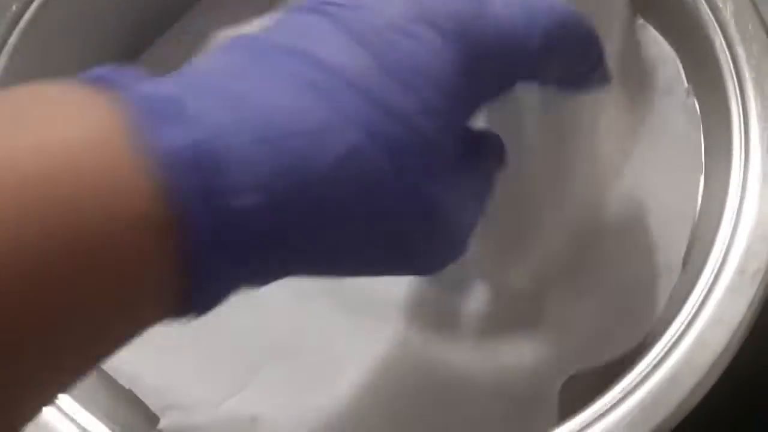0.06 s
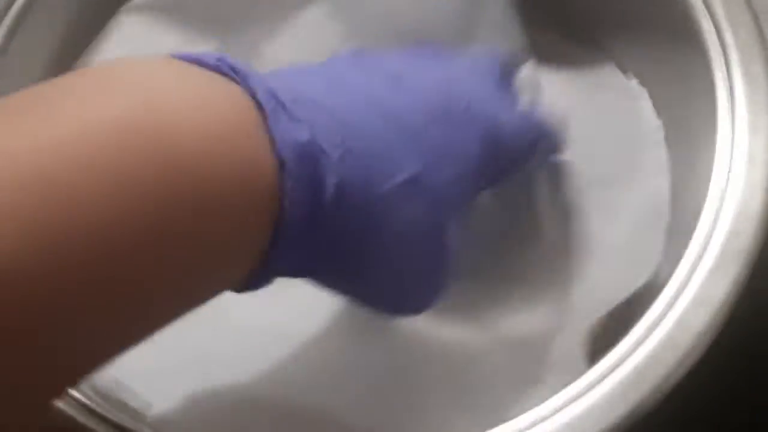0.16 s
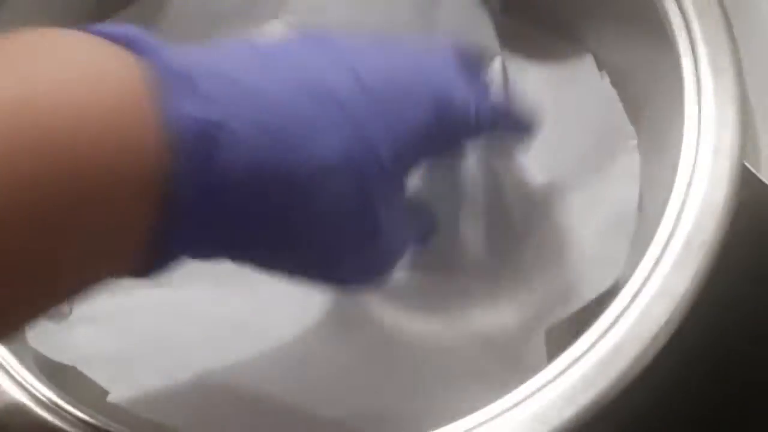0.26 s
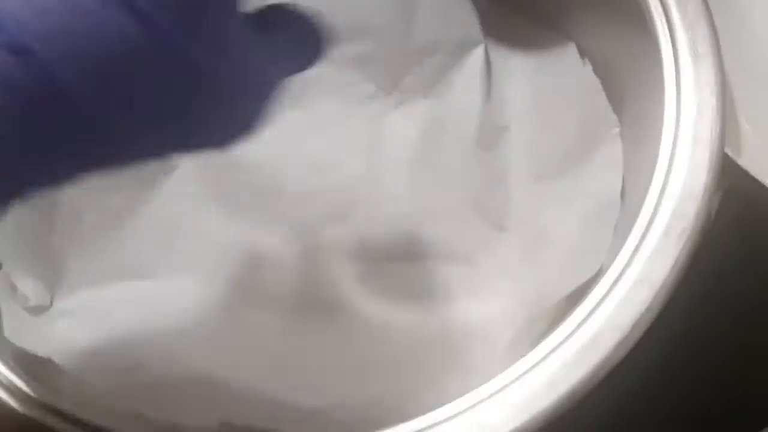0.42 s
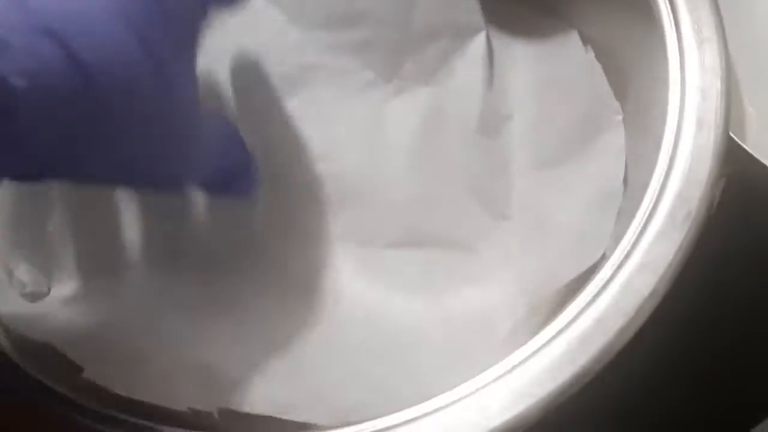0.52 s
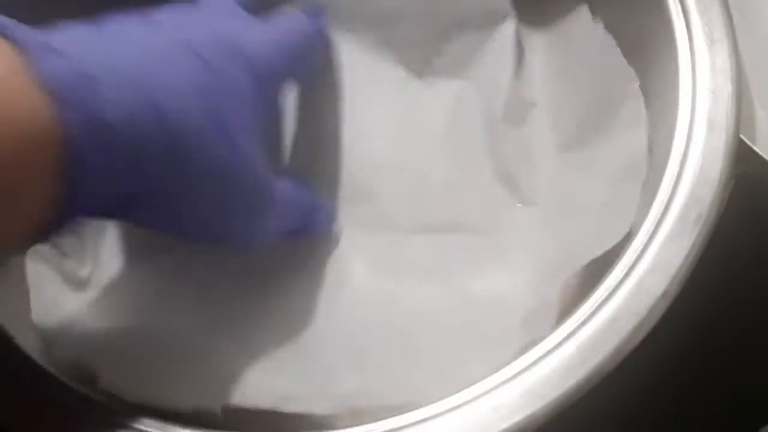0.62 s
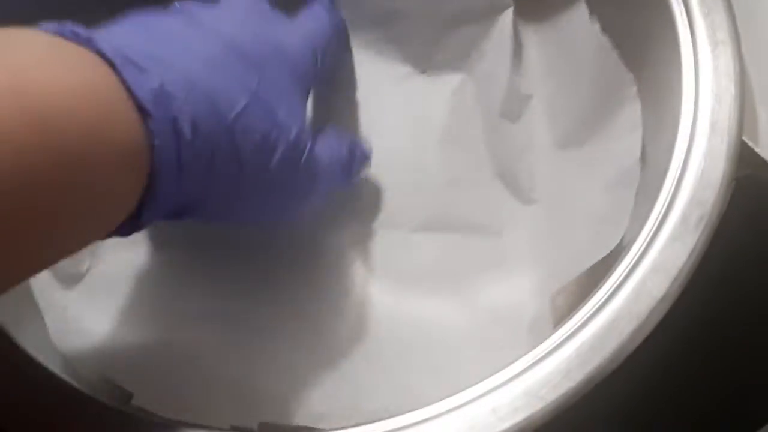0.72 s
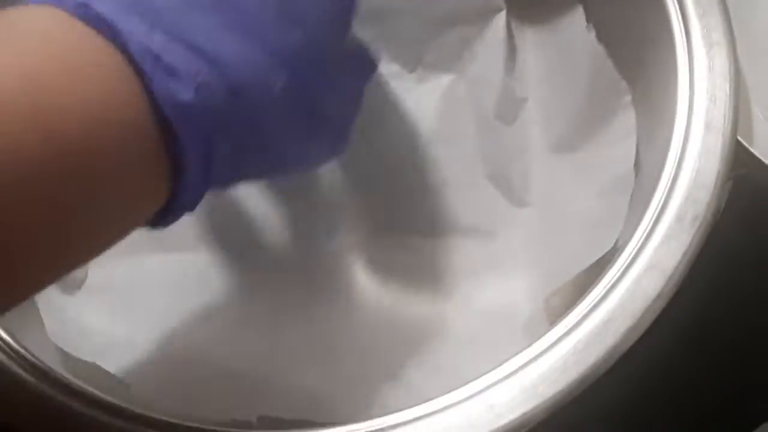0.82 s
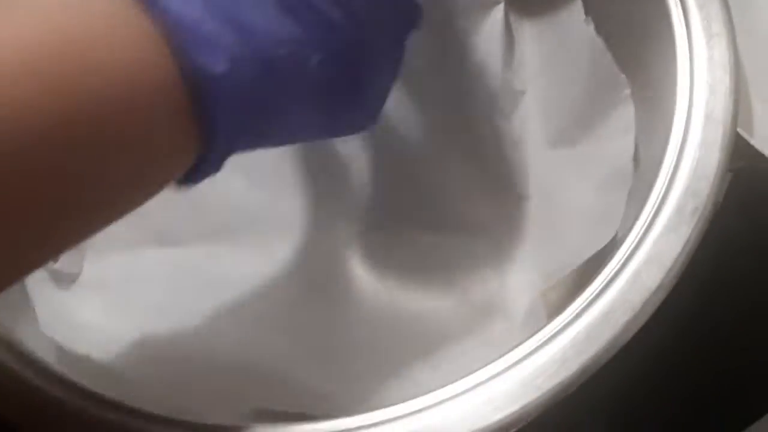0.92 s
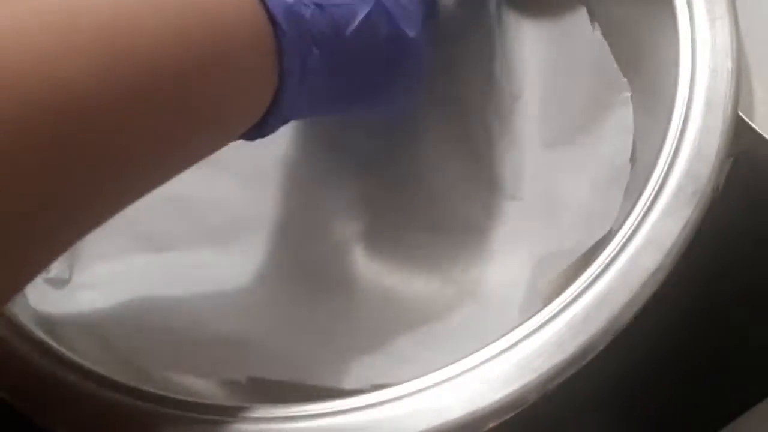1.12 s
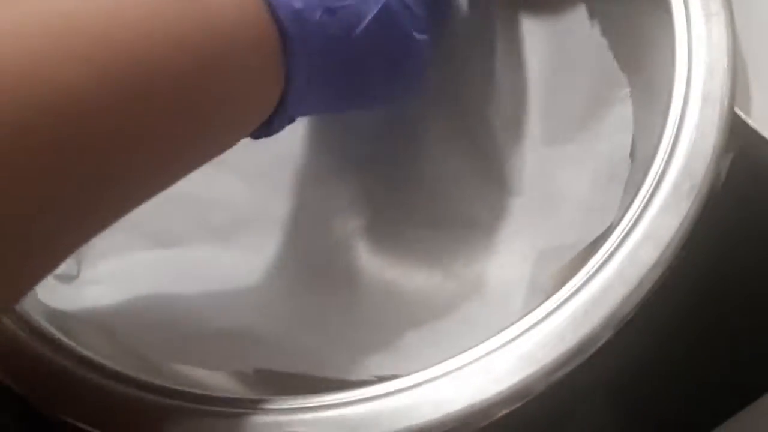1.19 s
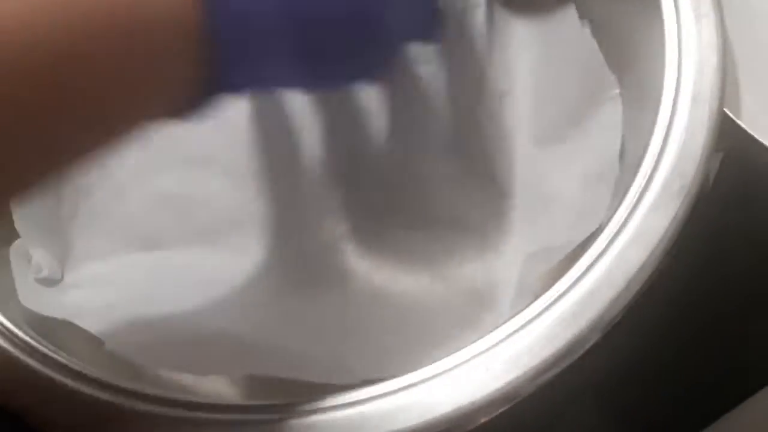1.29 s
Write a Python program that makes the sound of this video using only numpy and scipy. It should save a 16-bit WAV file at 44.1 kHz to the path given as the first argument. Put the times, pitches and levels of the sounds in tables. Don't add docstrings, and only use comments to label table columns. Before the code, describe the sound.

Stiff baking paper crinkles loudly in three quick bursts, with sharp bright snaps and soft low thuds, as a hand presses it into a steel pot; close stereo microphones, quiet kitchen with faint reverberation.

```python
import sys
import numpy as np
from scipy import signal
from scipy.fft import rfft, irfft
from scipy.io import wavfile
from scipy.ndimage import uniform_filter1d

SR = 44100
rng = np.random.default_rng(int(sys.argv[2]) if len(sys.argv) > 2 else 0)


def dump(signal):
    limited = np.clip(np.atleast_2d(signal).T, -1, 1)
    pcm = np.round(limited * 32767).astype(np.int16)
    wavfile.write(sys.argv[1], SR, pcm)


def invert_db(level):
    return 10 ** (np.asarray(level, dtype=float) / 20)


N = 59535

# (frequency [Hz], level [dB], decay time T60 [s])
HOLLOW_MODES = [(386, -14.5, 0.082), (429.6, -3.5, 0.14), (467.3, 5, 0.059), (509, 0, 0.08),
                (665, -10, 0.18), (988, -17, 0.1)]
BRIGHT_HZ = 6500


def evened(x):
    return x / np.sqrt(np.mean(x ** 2) + 1e-20)


def read(points, hz):
    f, value = np.transpose(points)
    return np.interp(np.log(hz + 1), np.log(f + 1), value)


def add(mix, s, sound):
    part = mix[max(round(s * SR), 0):][:len(sound)]
    part += sound[:len(part)]


def colour(x, points):
    hz = abs(np.fft.fftfreq(4096, 1 / SR))
    log_gain = np.log(invert_db(read(points, hz)))
    response = np.exp(np.conj(signal.hilbert(log_gain)))
    taps = np.fft.ifft(response).real[:2048]
    taps = taps / np.linalg.norm(taps)
    return signal.fftconvolve(x, taps[None], axes=1)[:, :N]


def ring(modes, length=0.95):
    t = np.arange(0, length, 1 / SR)
    out = 0
    for hz, db, t60 in modes:
        onset = 1 - np.exp(-t * hz)
        out = out + invert_db(db - 60 * t / t60) * np.sin(2 * np.pi * hz * t) * onset
    return out


def paired(left, other):
    # (frequency [Hz], share [0-1])
    direct_same = [(500, 0.99), (1300, 0.6), (2500, 0.3), (6000, 0.29), (16000, 0.9)]
    same = np.clip(read(direct_same, np.linspace(0, SR / 2, len(left))), 0, 1)
    return np.array([left, same * left + np.sqrt(1 - same ** 2) * other])


def air():
    # (frequency [Hz], density [dB/Hz])
    air_spectrum = [(15, -36.5), (25, -18), (114, 1), (200, -20), (317, -3.5), (1160, -15), (1520, -14.5),
                    (4400, -19.5), (16000, -24.5)]
    level_db, same = -65, 0.36
    a, b = rng.standard_normal((2, N))
    other = same * a + np.sqrt(1 - same ** 2) * b
    return invert_db(level_db) * colour(np.array([a, other]), air_spectrum)


def crackle():
    # (time [s], effort [dB], brightness [dB])
    presses = [
        [(0.046, -78.5, -21.5), (0.058, -37.5, -16.5), (.108, -32.5, -2.5), (.111, -24.5, -7),
         (.128, -21.5, -2), (.136, -28.5, -10)],
        [(.137, -27, -5), (.156, -22.5, -6.5), (.174, -18, 0), (.19, -23.5, -1), (.2, -27, -1.5),
         (0.224, -34, -7.5), (0.234, -28, -11), (0.26, -43.5, -9), (0.31, -76, -9)],
        [(0.542, -51.5, -23), (.548, -26.5, -11.5), (0.56, -36.5, -0.5), (0.597, -33.5, -2), (0.605, -24, 0),
         (.645, -23, -3), (.65, -34, 4), (.691, -31.5, 3), (.717, -46, -3)],
        [(.718, -40, 8.5), (.73, -34, -1), (.745, -38, -4), (.762, -42.5, -3), (.795, -44.5, -1),
         (0.826, -49.5, -12)],
        [(0.84, -48, -2), (0.848, -44.5, -6), (0.9, -56.5, -8), (0.935, -53, -15)],
        [(0.943, -49.5, -14), (0.959, -32, -9.5), (0.989, -25, 2.5), (1.001, -29, -1.5), (1.024, -26, -3.5),
         (1.037, -23.5, 5.5), (1.056, -34.5, 6), (1.066, -40, 7)],
        [(1.067, -39, 3), (1.077, -39.5, 1), (1.113, -38, 1), (1.165, -49, -3.5), (1.27, -64, -17)],
    ]
    crackles_per_s, size_spread_db, fade_s = 2500, 3, 0.00032
    level_db, hiss_db, spacing_s = 0.5, -4.5, 0.0002
    t, burst_t = np.arange(N) / SR, np.arange(200) / SR
    effort = sum(invert_db(np.interp(t, *np.transpose(p)[:2], left=-120, right=-120)) for p in presses)
    times, _, bright_db = np.concatenate(presses).T
    bright = invert_db(1 + np.interp(t, times, bright_db))

    size = invert_db(size_spread_db * np.minimum(rng.exponential(1, N), 4))
    size = size * (rng.random(N) < crackles_per_s / SR)
    place = rng.integers(0, 24, N)
    out = np.zeros((2, N))
    for k in range(24):
        fade = np.exp(-burst_t / (fade_s * rng.uniform(1.0, 3.0)))
        burst = rng.standard_normal((2, 200)) * fade
        burst = irfft(paired(*rfft(burst / np.linalg.norm(burst[0]))))
        a, b = signal.oaconvolve((size * (place == k))[None], burst, axes=1)[:, :N]
        lag = round(rng.uniform(0, 1) * spacing_s * SR)
        out += [a, np.roll(b, lag)]

    hiss = irfft(paired(*rfft(rng.standard_normal((2, N + 9)))))
    hiss = np.array([hiss[0, 8:N + 8], hiss[1, :N]])
    both = evened(out) + invert_db(hiss_db) * hiss
    low = signal.filtfilt(*signal.butter(2, BRIGHT_HZ, fs=SR), both)
    return invert_db(level_db) * effort * (low + bright * (both - low))


def hollow_hum(sheet):
    return signal.fftconvolve(sheet.mean(0), invert_db(-36) * ring(HOLLOW_MODES))[:N]


def echo(x, decay, start, step, count=6):
    # (frequency [Hz], share [0-1])
    echo_same = [(300, 0.3), (700, 0.2), (1500, 0), (16000, 0.2)]
    wander_per_s = 16
    taps = np.zeros((count, 2, SR // 2))
    at = np.arange(start, SR // 2 - step, step)
    shape = (count, 2, len(at))
    np.put_along_axis(taps, at + rng.integers(0, step, shape), rng.choice([-1., 1.], shape), 2)

    hz, t, z = signal.stft(taps, SR, nperseg=128)
    same = np.clip(read(echo_same, hz), 0, 1)[:, None]
    other = same * z[:, 0] + np.sqrt(1 - same ** 2) * z[:, 1]
    z = np.stack([z[:, 0], other], 1)
    fade = invert_db(-60 * t / read(decay, hz)[:, None])
    tails = signal.istft(z * fade, SR, nperseg=128)[1]
    tails = tails / np.linalg.norm(tails[:, :1], axis=2, keepdims=True)

    turn = np.arange(N) / SR * wander_per_s * count - np.arange(count)[:, None]
    turn = turn % count - 1
    share = np.cos(np.pi / 2 * np.clip(turn, -1, 1))[:, None]
    return signal.fftconvolve(share * x.mean(0), tails, axes=2).sum(0)[:, :N]


def snaps():
    # (time [s], peak [dB], pitch [Hz], pitch share [dB],
    # treble [dB])
    large_snaps = [(.0534, -46, 3800, -1.5, -7.5), (.0578, -47, 3620, -4, -6.5),
                   (.0727, -22, 1970, 1.5, -7.5), (.11, -16, 4000, -0.5, -9), (.1208, -13, 2680, -7, -2.5),
                   (.1264, -8.5, 2740, -5, -2), (.1447, -9.5, 4140, 0.5, 0), (.151, -16.5, 4400, -2.5, -8),
                   (.1578, -9.5, 5030, -9.5, 2), (.1698, -5, 6100, -2.5, 0), (.1722, -6, 1500, -2.5, 1.5),
                   (.1818, -7, 4430, -1.5, -2.5), (.1876, -5.5, 4910, -1.5, 4),
                   (.2064, -10.5, 2300, -12.5, -0.5), (.2307, -11, 1420, -4, 2), (.236, -15, 6560, 1.5, -4),
                   (0.6039, -4, 2170, 0, 5.5), (.6093, -7, 2080, 0.5, 2), (0.6194, -19, 4240, -10.5, -1),
                    (0.623, -7, 4800, -5, -5), (0.6317, -11.5, 4100, -6, -11), (0.64, -13.5, 4840, 1, -2),
                    (.644, -10.5, 3250, 2.5, 1.5), (0.6555, -14, 5860, 1.5, -10),
                    (0.6606, -15.5, 3760, 7.5, -7.5), (0.6754, -7.5, 5400, -5.5, 1),
                    (0.7053, -22.5, 2110, 4.5, -5), (0.7207, -14, 3860, -1.5, -13.5),
                    (0.725, -20, 4500, -1, 4.5), (0.7488, -13, 6000, -20, 3.5),
                    (0.753, -21.5, 4500, -3, -9), (0.778, -24, 3000, -2, -0.5),
                    (0.7927, -28.5, 3500, 2, -4), (0.8328, -15.5, 3430, -0.5, -6),
                    (0.8339, -12.5, 3750, 5, 6),
                   (.9737, -24, 6500, -11, 5), (0.9809, -10.5, 4780, -9, 2), (.988, -14, 4660, 0, -2),
                   (0.9917, -7, 4760, -4, -7), (1.0268, -5, 4100, -5, 7), (1.0302, -8, 4400, -11, -1),
                   (1.0345, -4, 7580, -11, 0.5), (1.0419, -2.5, 6000, -23, 5), (1.048, -13, 5940, 3, -5),
                   (1.054, -28, 7050, -8, 11), (1.0624, -20, 5300, -4, -1), (1.1602, -27, 3570, 3, -5),
                   (1.2061, -35.5, 2480, 0, -5)]
    # (time [s], peak [dB], pitch [Hz], pitch share [dB], treble [dB])
    contacts = [
        (.5475, -14.5, 2230, -13, -17),
        (0.9428, -25.5, 1230, 4.5, -32),
    ]
    hold_s, fade_s, rise_s, lag_s = 0.0011, 0.0007, 0.00051, 0.0001
    level_db, sharpness_q, low_share = -11, 2.2, 0.29
    rows = large_snaps + contacts
    out, t = np.zeros((2, N)), np.arange(512) / SR
    noise = rng.standard_normal((len(rows), 2, 512))
    shape = np.exp(-np.maximum(t - hold_s, 0) / fade_s) * np.minimum(t / rise_s, 1)
    upper = 1 / (1 + (BRIGHT_HZ / (np.fft.rfftfreq(512, 1 / SR) + 1)) ** 4)
    for (s, db, hz, pitch_db, treble_db), n in zip(rows, noise):
        z = paired(*rfft(shape * n))
        smooth = np.sqrt(uniform_filter1d(abs(z) ** 2, size=5))
        even = irfft(z / smooth * invert_db(treble_db * upper))
        even = signal.lfilter(*signal.butter(2, low_share * hz, 'high', fs=SR), even)
        tone = signal.lfilter(*signal.iirpeak(hz, sharpness_q, SR), even)
        burst = even / np.linalg.norm(even[0]) + invert_db(pitch_db) * tone / np.linalg.norm(tone[0])
        burst = 7 * invert_db(db + level_db) * burst
        add(out[0], s, burst[0])
        add(out[1], s + lag_s, burst[1])
    return out


def palm_thumps(out):
    # (time [s], peak [dB], pitch [Hz])
    thumps = [
        (0.104, -36, 202),
        (0.191, -37, 218),
        (0.238, -41, 218),
        (.53, -47, 190),
        (0.622, -33.5, 145),
        (0.658, -41, 203),
        (0.698, -71, 160),
        (1.005, -65, 199),
        (1.043, -34.5, 218),
    ]
    t60_s, rise_s, lag_s = 0.089, 0.034, 0.00077
    for s, db, hz in thumps:
        for ear, upper_db, lag in zip(out, (-2, -7), (0, lag_s)):
            thud = ring([(hz, 0, t60_s), (1.8 * hz, upper_db, t60_s)])
            rise = np.minimum(np.arange(len(thud)) / SR / rise_s, 1)
            add(ear, s + lag, invert_db(db) * thud * rise)


def wall_touches(out):
    # (time [s], peak [dB])
    touches = [(0.32, -39), (0.372, -41), (0.427, -43.5), (0.469, -65), (0.757, -55), (0.797, -43.5),
               (0.849, -38.5), (0.886, -44.5), (1.108, -62.5), (1.174, -51), (1.225, -46), (1.275, -47.5)]
    touch_s, hollow_db, scuff_db, scuff_hz = 0.0071, -13, -3, 2460
    t = np.arange(SR // 10) / SR
    rubs = rng.standard_normal((len(touches), 2, len(t))) * t / touch_s * np.exp(-t / touch_s)
    dull = signal.butter(2, scuff_hz, fs=SR)
    for (s, db), (a, b) in zip(touches, rubs):
        for ear, rub in zip(out, (a, a + 0.23 * b)):
            hollow = signal.fftconvolve(rub / np.linalg.norm(a), ring(HOLLOW_MODES))
            add(ear, s, invert_db(db + hollow_db) * hollow)
            add(ear, s, invert_db(db + scuff_db) * signal.lfilter(*dull, rub))


def knuckle_ring(out):
    # (frequency [Hz], level [dB], decay time T60 [s])
    wall_modes = [(1308, -6, .4), (1507, -6, .7), (1728, -10, .6), (1873, -10, .4), (2148, -11, .55),
                  (2740, 0, .43), (2752, -9, .3), (3526, -16, .4)]
    for ear in out:
        add(ear, 0.33, invert_db(-57) * ring(wall_modes))


def pot():
    out = np.zeros((2, N))
    palm_thumps(out)
    wall_touches(out)
    knuckle_ring(out)
    return out


def scene():
    # (frequency [Hz], density [dB/Hz])
    sheet_spectrum = [(59, -62.5), (100, -24), (234, -17), (389, -25.5), (640, -9), (1480, -4),
                      (3100, -1.5), (4870, -0.5), (16000, -3)]
    # (frequency [Hz], decay time T60 [s])
    pot_t60 = [(300, 0.038), (2000, 0.061), (5500, 0.028), (15000, 0.028)]
    room_t60 = [(300, 0.99), (1000, 1), (3000, 0.49), (8000, 0.37), (15000, 0.31)]
    pot_db, snap_echo_db, room_db, left_db = 0, -2.5, -19, -1.93
    small = colour(crackle(), sheet_spectrum)
    large = colour(snaps(), sheet_spectrum)
    sheet = small + large
    hum = hollow_hum(sheet)
    inside = invert_db(pot_db) * echo(small + invert_db(snap_echo_db) * large, pot_t60, start=30, step=12)
    no_rumble = signal.butter(4, 94, 'high', fs=SR)
    near = signal.lfilter(*no_rumble, sheet + inside + hum + pot())
    room = invert_db(room_db) * echo(near, room_t60, start=500, step=20)
    balance = invert_db([[left_db / 2], [-left_db / 2]])
    return (near + room) * balance + air()


def low_pass(x):
    return signal.sosfilt(signal.butter(12, 16970, fs=SR, output="sos"), x)


def record(dry):
    ceiling = 2
    edge = signal.firwin(255, 15900, window=("kaiser", 5), fs=SR)
    overloaded = ceiling * np.tanh(dry / ceiling)
    mix = signal.oaconvolve(overloaded, edge[None], "same")
    return low_pass(mix)


dry = scene()
out = record(dry)
dump(out)
```